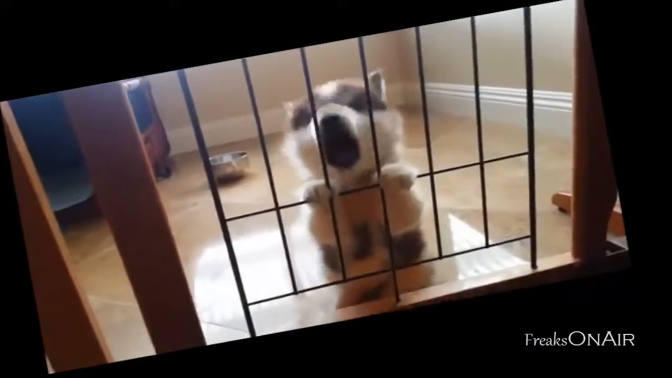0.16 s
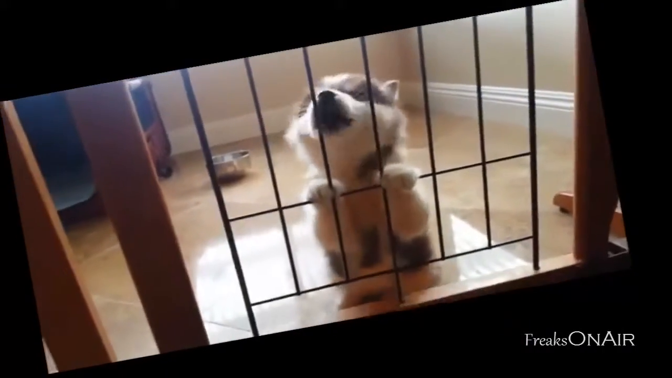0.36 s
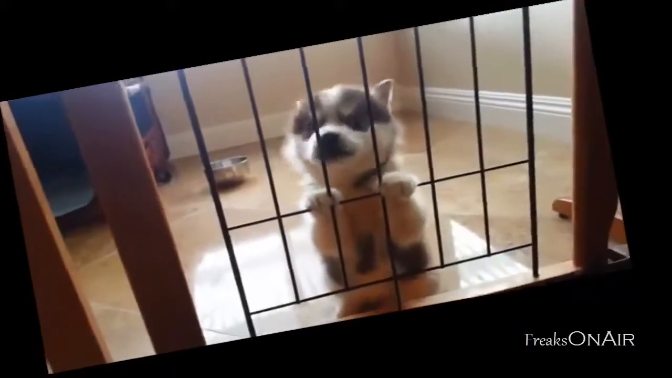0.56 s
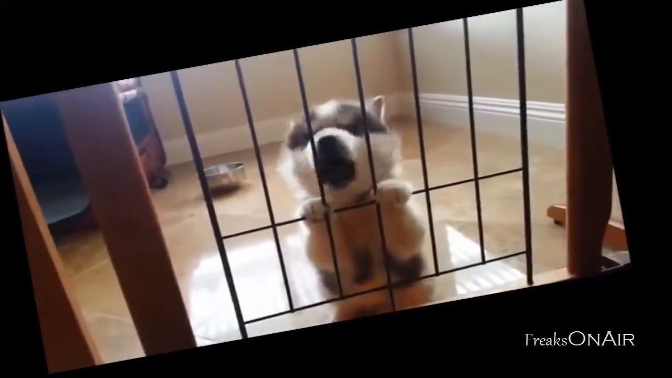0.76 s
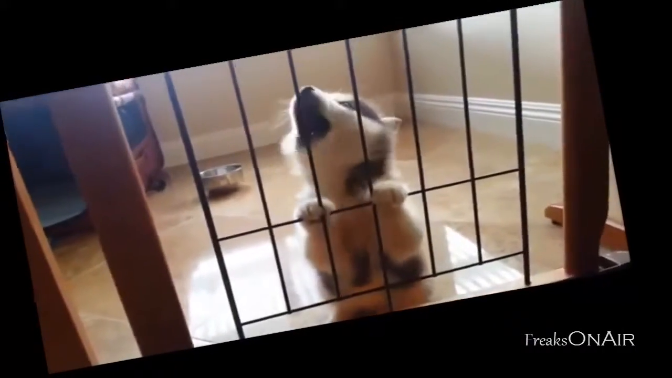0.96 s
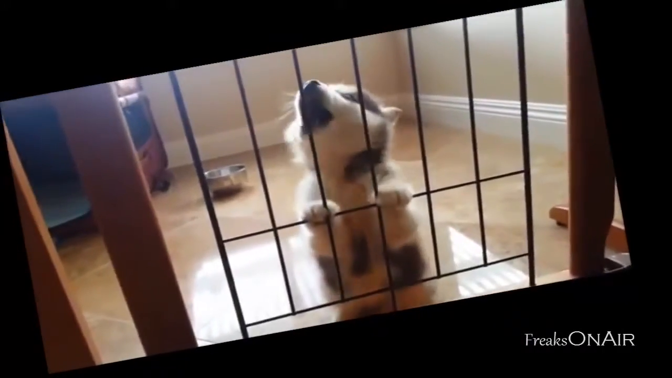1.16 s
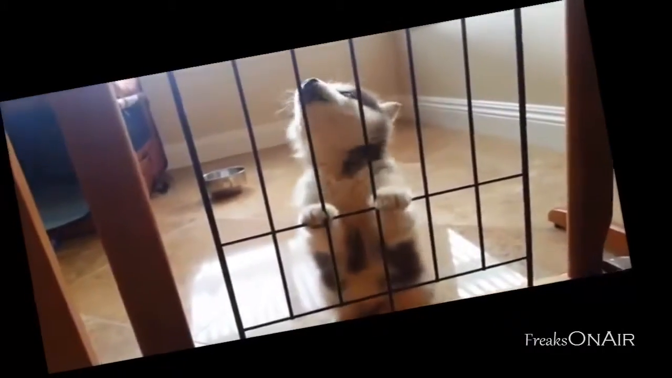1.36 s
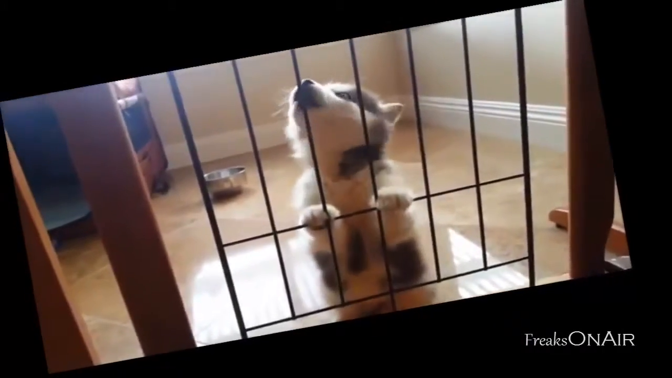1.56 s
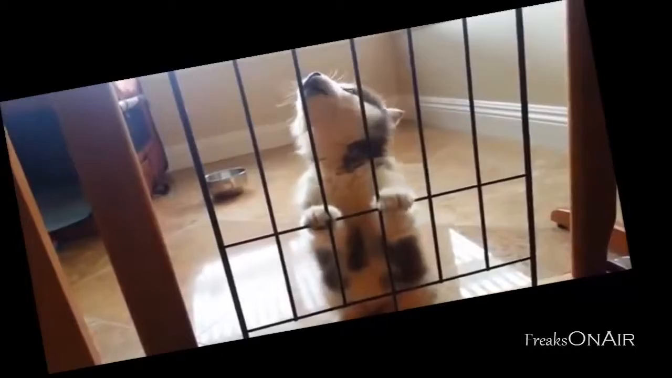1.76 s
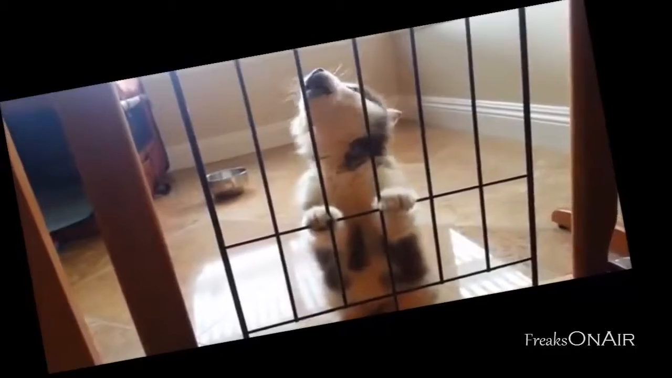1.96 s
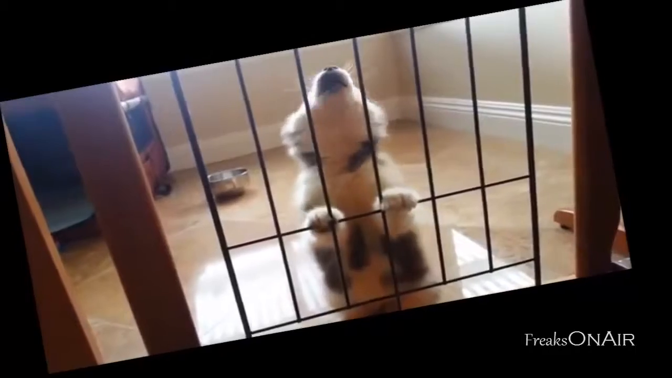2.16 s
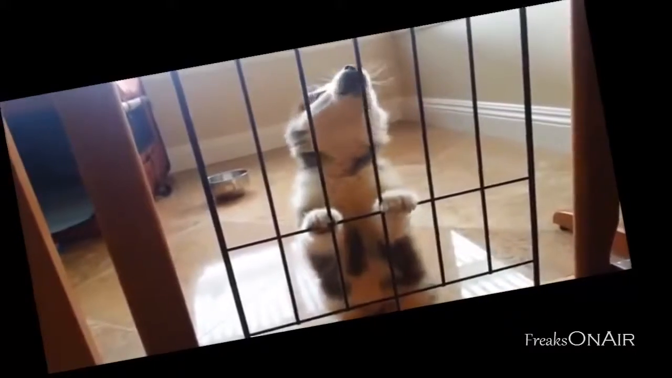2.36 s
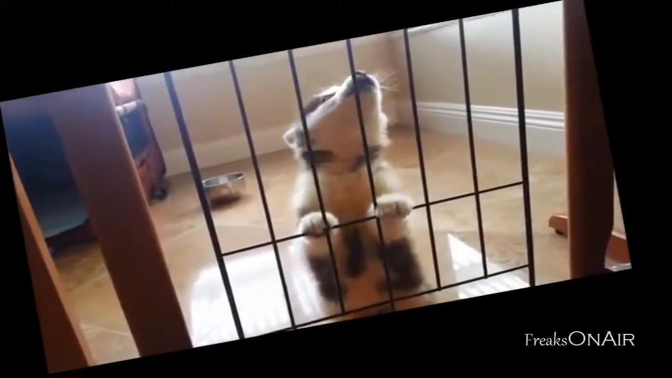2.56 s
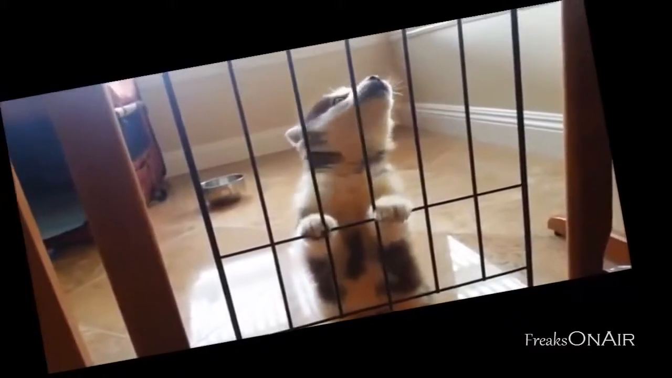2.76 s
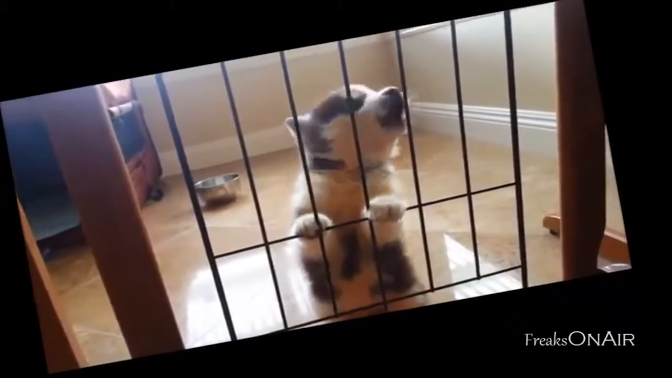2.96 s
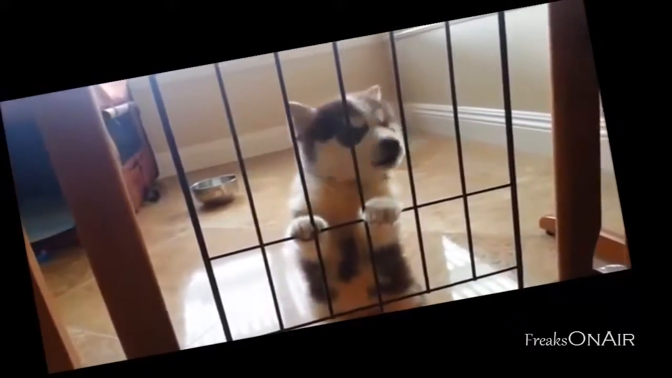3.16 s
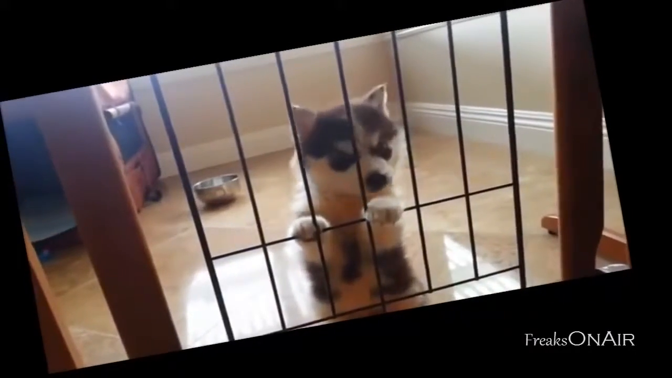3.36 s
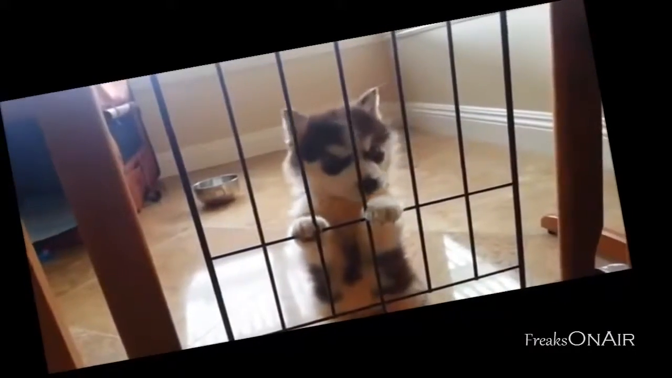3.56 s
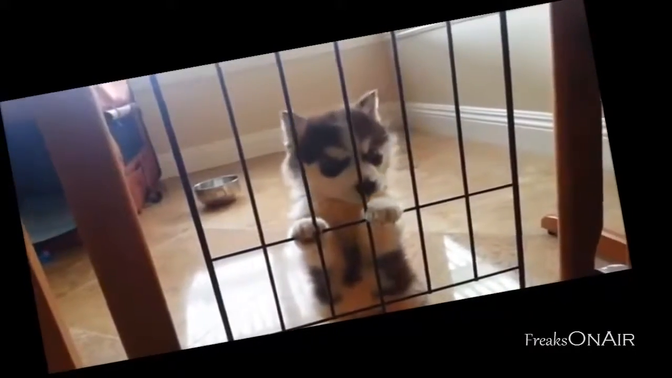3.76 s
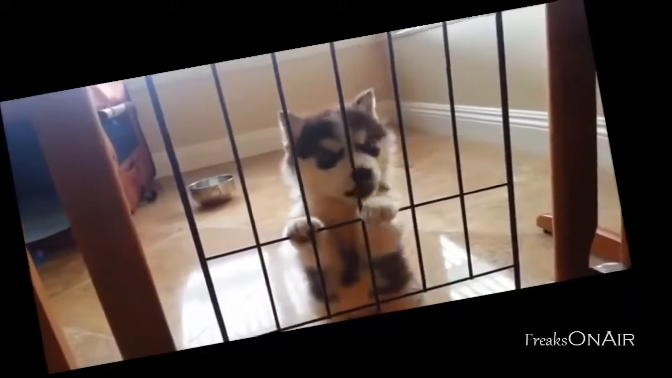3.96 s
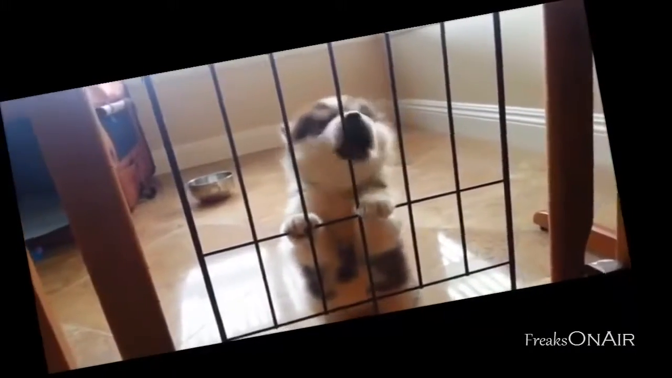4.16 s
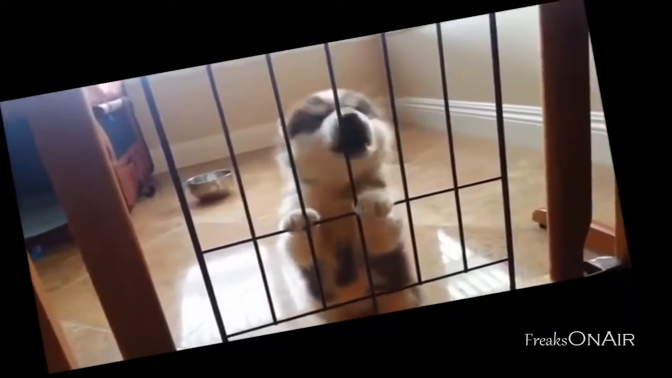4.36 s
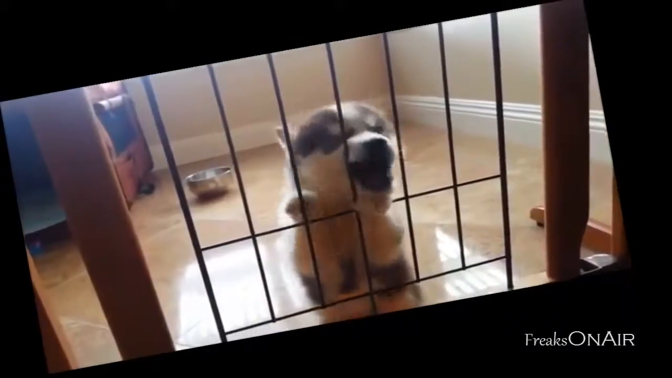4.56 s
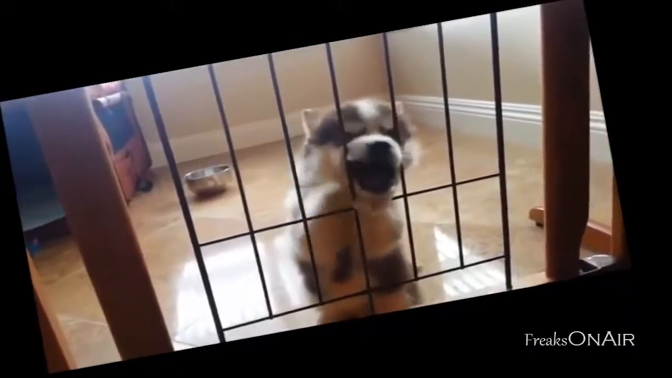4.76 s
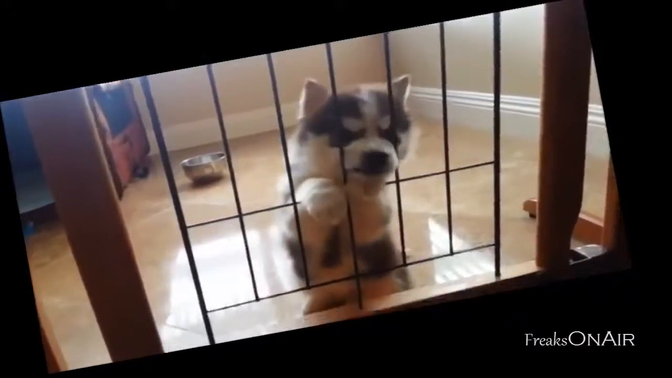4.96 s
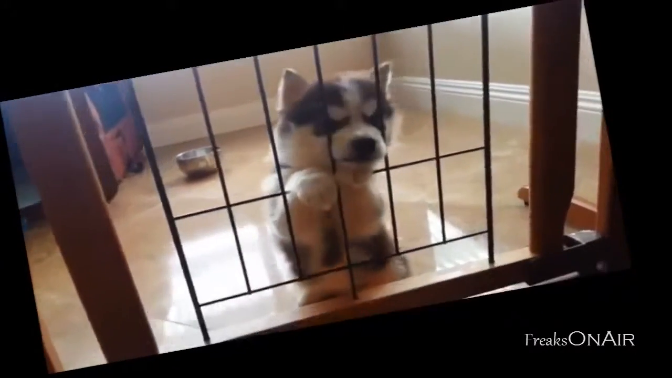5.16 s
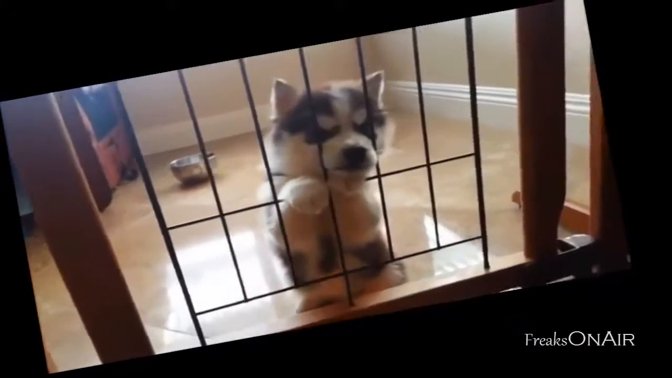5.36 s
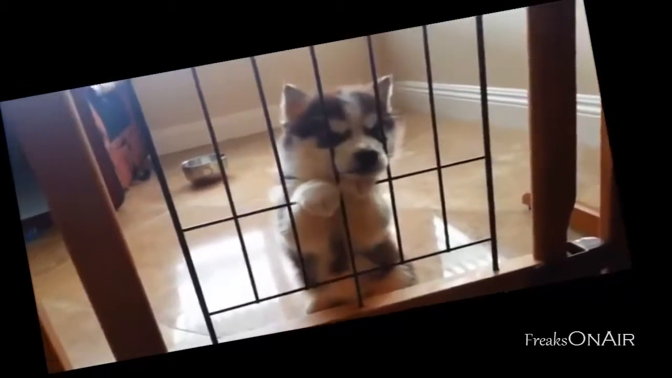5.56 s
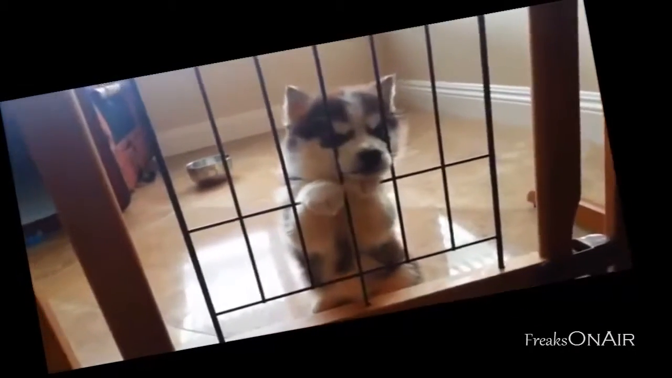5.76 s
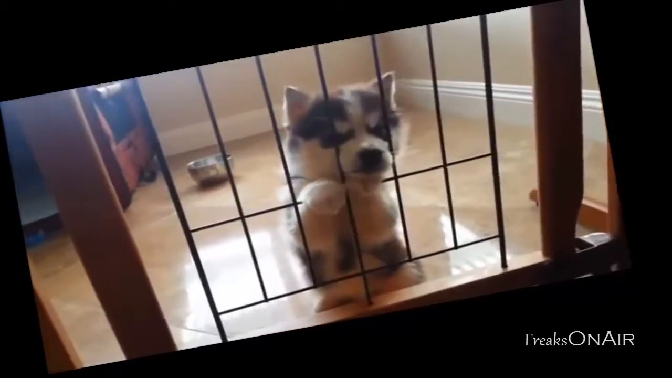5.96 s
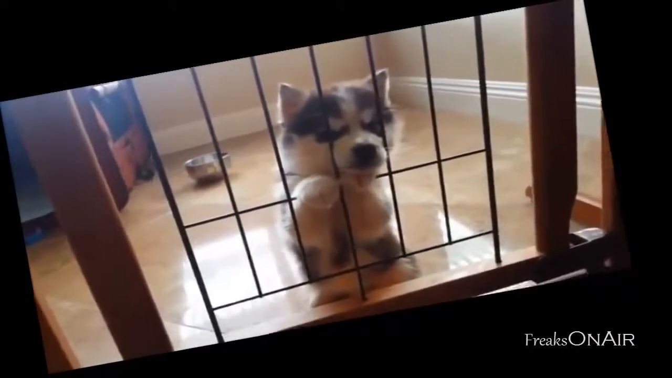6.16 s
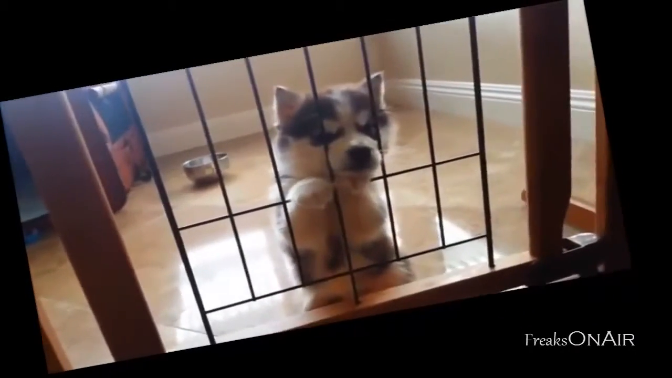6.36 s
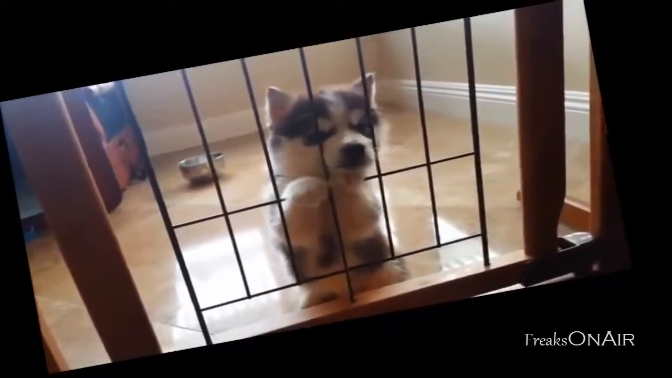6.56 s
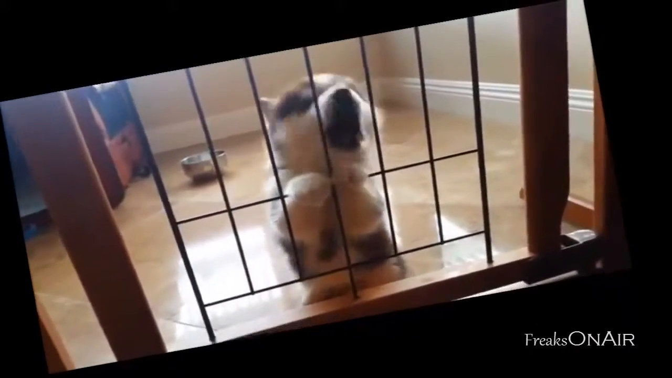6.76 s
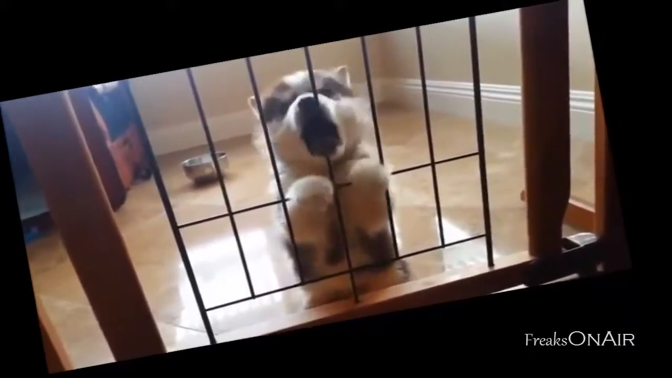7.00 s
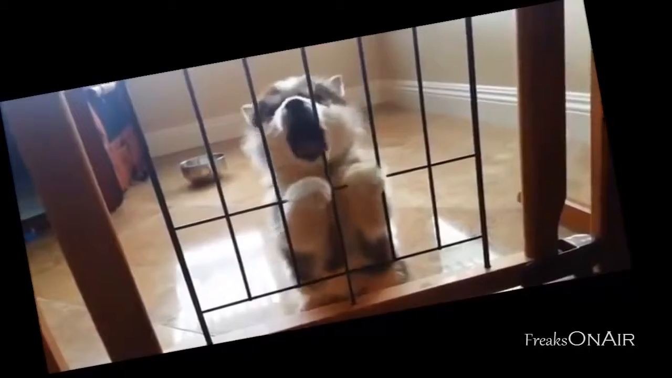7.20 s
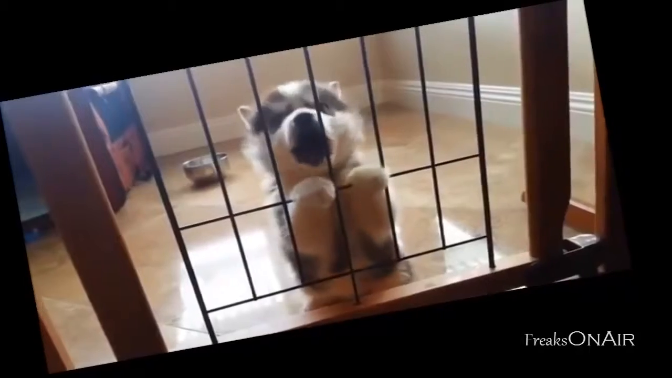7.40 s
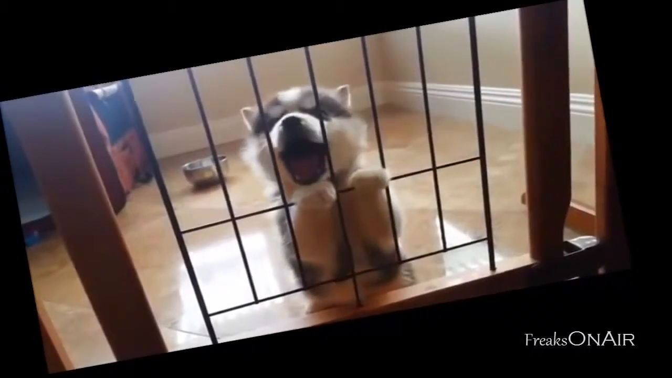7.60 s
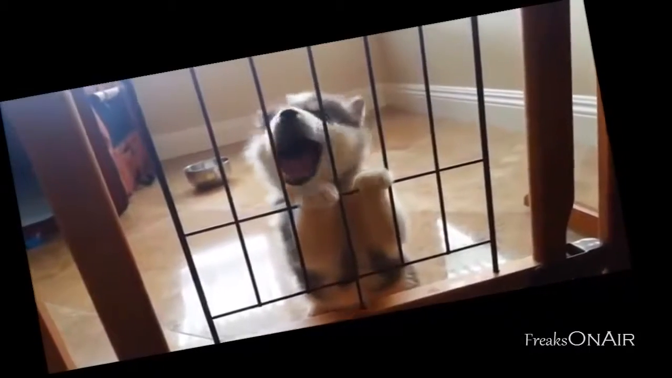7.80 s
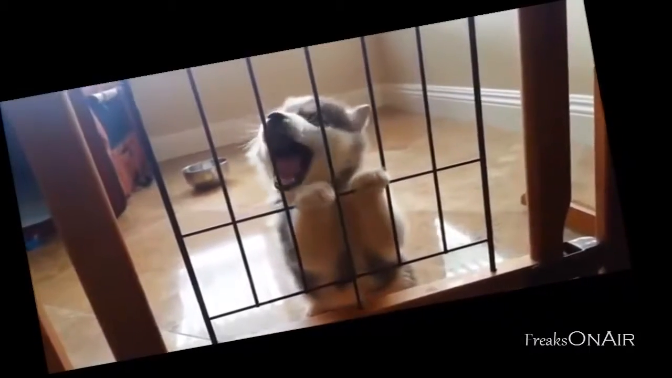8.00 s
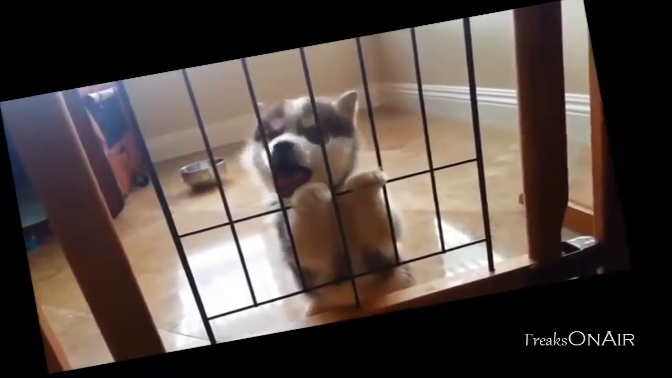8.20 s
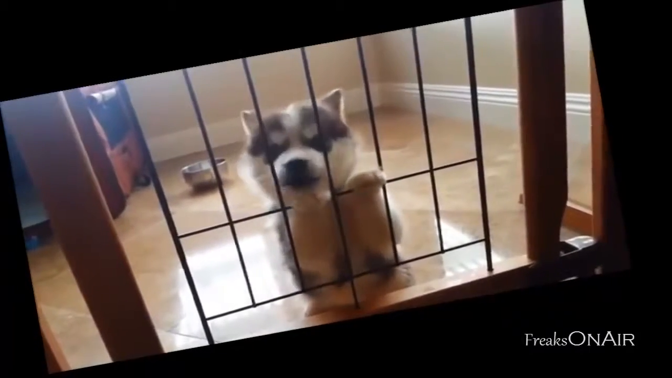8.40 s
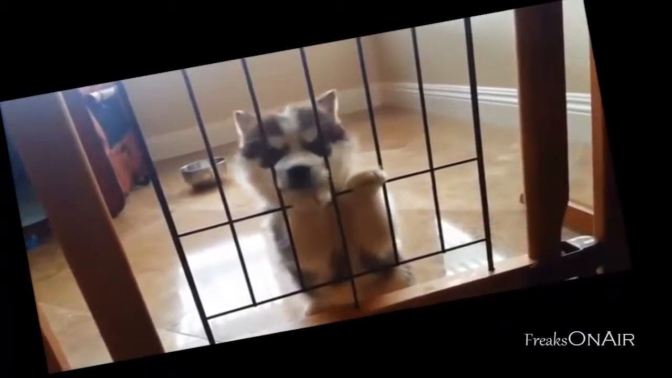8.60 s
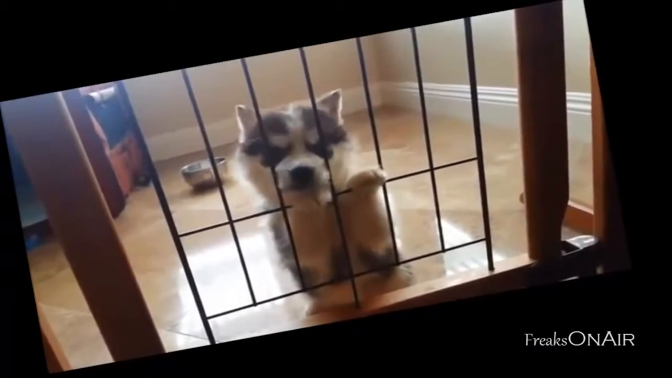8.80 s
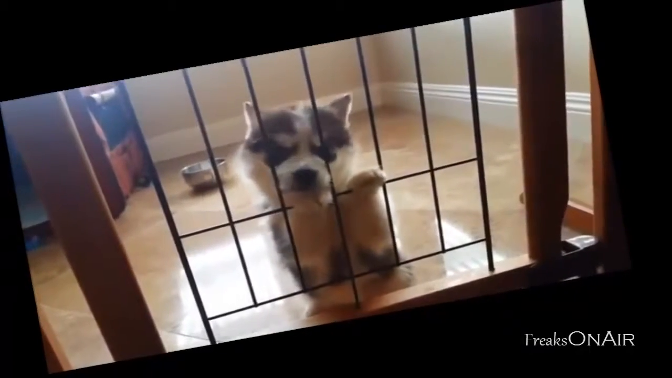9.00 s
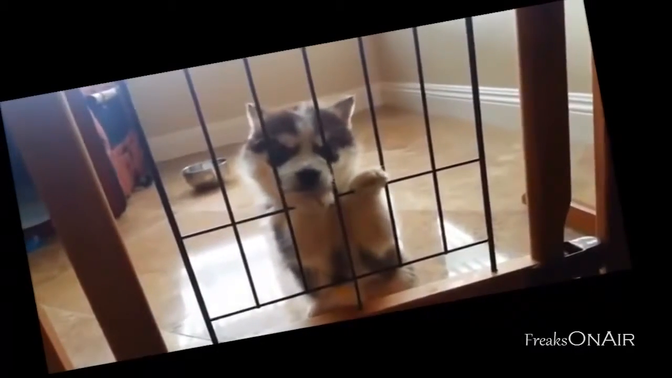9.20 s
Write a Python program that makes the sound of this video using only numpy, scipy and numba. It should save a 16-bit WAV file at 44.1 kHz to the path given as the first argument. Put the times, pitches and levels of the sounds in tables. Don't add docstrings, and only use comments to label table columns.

```python
import sys
import numpy as np
from scipy import signal
from scipy.fft import rfft, irfft
from scipy.io import wavfile
from scipy.ndimage import uniform_filter1d
from numba import njit

SR = 44100
rng = np.random.default_rng(int(sys.argv[2]) if len(sys.argv) > 2 else 0)


def log_audio(samples):
    frames = np.atleast_2d(samples).T
    limited = np.clip(frames, -1, 1)
    pcm = np.round(limited * 32767).astype(np.int16)
    wavfile.write(sys.argv[1], SR, pcm)


def gain_from_db(level_db):
    decades = np.asarray(level_db, float) / 20
    return 10 ** decades


N = 407471
TIME = np.arange(N) / SR

# (how wide the mouth opens, as treble in dB relative to the level).
CALLS = [(-.03, 0.17, 0.039, -18.5, -13.5), (0.344, 0.25, 0.22, -20, -10.5), (.935, .47, 0.058, -20, -10.5),
         (1.618, 0.057, 0.26, -18.5, -11), (2.071, 0.063, .09, -22, -25.5),
         (2.277, 1.114, 0.12, -28.5, -26.5), (4.074, 0.019, 0.04, -38.5, -48.5),
         (4.292, 0.86, .175, -22, -4), (6.903, 1.342, 0.01707, -21, -8), (8.438, 0.13, 0.43, -23, -8),
         (8.652, 0.68, 0.059, -37.5, -16)]
# time in seconds, pitch in Hz, swell of the mouth tone in dB.
HOWL_LINE = [(2.269, 578, -2), (2.418, 578.5, 4.5), (2.574, 567.5, 10.5), (2.62, 553, 2.5),
             (2.749, 528.8, 2.5), (2.948, 525.3, -4.5), (3.05, 525.2, 3), (3.39, 553, -12.5),
             (3.488, 617, 6.5)]
# time in seconds, centre of the shaded band in Hz, its width in Hz,
# jaw opening as a share of the usual, treble in dB.
HEAD_POSTURE = [(0, 3420, 500, 1.174, -2.5), (.3, 3060, 907, 0.71, 9.5), (.36, 3990, 301.8, 1.08, -0.5),
                (.55, 2986, 386.5, 1.084, -2.5), (.9, 2876, 500, 0.34, 8), (.95, 3710, 303.5, 0.85, -0.5),
                (1.14, 3896, 500, 1.52, 3), (1.25, 3735, 910, 1.3, -4.5), (1.45, 4336, 907, 0.92, 1.5),
                (1.65, 4484, 980, 0.96, -1), (2.1, 4432, 1395, 0.98, -1.5), (2.5, 4420, 1500, 0.95, 2.5),
                (2.9, 3980, 1203, 0.82, 3), (3.2, 4150, 1150, 1.215, 6), (3.45, 4240, 998, 1.27, 7.5),
                (4.3, 3537, 304, 1.24, -3.5), (4.62, 3248, 400, 0.9, 2.5), (5.0, 3333, 500, 1.334, -3.5),
                (5.3, 3060, 404.3, 0.79, 3.5), (6.9, 3760, 299, 1.12, 6.5), (7.0, 3664, 500, 0.9, -4),
                (7.35, 3630, 500, 1.34, 2.5), (7.5, 3695, 500, 0.99, 2), (8.3, 3940, 500, 1.035, -5.5),
                (8.45, 3817, 397.5, 1.06, -3), (8.56, 4020, 405, 1.1, 0.5), (8.66, 3910, 500, 0.91, -0.5),
                (9.24, 3980, 500, 0.88, 5.5)]


def along(table):
    s, *columns = np.transpose(table)
    return [np.interp(TIME, s, c) for c in columns]


def window(t0, t1, fade):
    return np.clip(np.minimum(TIME - t0, t1 - TIME + fade) / fade, 0, 1) ** 2


def even(x, span=0.018):
    power = uniform_filter1d(uniform_filter1d(x ** 2, int(span * SR)), int(span * SR))
    return x / np.sqrt(power + 1e-12)


def walk(rate):
    k = int(SR / rate)
    steps = np.repeat(rng.standard_normal(N // k + 1), k)
    return 1.5 * uniform_filter1d(uniform_filter1d(steps, k), k)[:N]


def butter(x, order, hz, kind="low"):
    return signal.sosfilt(signal.butter(order, hz, kind, fs=SR, output="sos"), x)


def shape(x, table, lag_s=0):
    hz, db = np.transpose(table)
    f = np.fft.rfftfreq(N, 1 / SR)
    gain = gain_from_db(np.interp(np.log(f + 1), np.log(hz), db))
    return irfft(rfft(x) * gain * np.exp(-2j * np.pi * f * lag_s), N)


@njit
def svf(x, hz, width):
    y, b, l = np.empty(len(x)), 0., 0.
    for i in range(len(x)):
        g, k = np.tan(np.pi * hz[i] / SR), width[i] / hz[i]
        v = (b + g * (x[i] - l)) / (1 + g * (g + k))
        b, l, y[i] = 2 * v - b, l + 2 * g * v, k * v
    return y


def ring(x, hz, width):
    hz, width = hz * np.ones(N), width * np.ones(N)
    return svf(svf(x, hz, width), hz, width)


def envelope():
    attack_s, attack_db, release_db = 0.026, -5.5, -26
    onset_bright_db, onset_bright_s, release_dull_db = 5, 0.18, -12
    level_db, gape_db, sounding = np.full(N, -60.), np.zeros(N), np.zeros(N)
    for s, hold, release, db, gape in CALLS:
        now = TIME >= s - .01
        age = TIME[now] - s
        fading = np.clip((age - hold) / release, 0, 1)
        level_db[now] = db + attack_db * np.clip(1 - age / attack_s, 0, 1) + release_db * fading
        brightness_db = onset_bright_db * np.exp(-age / onset_bright_s)
        gape_db[now] = gape + brightness_db + release_dull_db * np.sqrt(fading)
        sounding += window(s - .007, s + hold + release, .014)
    return level_db, gape_db, np.minimum(sounding, 1)


def melody():
    # start in seconds, first pitch in Hz, last pitch in Hz, roughness 0-1, odd harmonics in dB.
    short_notes = [(.345, 410.2, 1052, 0.41, -0.5), (.425, 1229, 762, 0.2, -9.5), (.55, 737, 880, 0.14, -3),
                   (.605, 859.4, 864, 0.11, -8.5), (.645, 858, 534, 0.03, 1.5),
                   (.935, 389.6, 497, 0.27, 9.5), (.975, 689.6, 734, 0.46, -6.5),
                   (1.02, 1157, 830.5, 0.12, -29.5), (1.112, 707, 765, 0.1, -1), (1.168, 805, 875, 0.4, -3),
                   (1.183, 1050, 1173, 0.35, -9), (1.206, 919, 874, 0.2, -22),
                   (1.222, 1040, 1190, 0.25, -8.5), (1.243, 590.6, 604.2, .4, -4.5),
                   (1.291, 854, 934, 0.03, -10.5), (1.335, 995.3, 1025, .06, -16),
                   (1.405, 1001, 603.5, 0.11, 3), (1.613, 440, 986, 0.24, -3.5), (1.7, 961, 744, .15, -10.5),
                   (1.735, 702, 553, 0.48, -1.5), (1.85, 546, 329.7, 0.33, -6.5),
                   (2.07, 389.7, 655, 0.21, 2.5), (2.128, 661, 640, 0.06, -10),
                   (4.074, 786.1, 772, 0.24, 7.5), (4.295, 374.9, 544.2, 0.26, 1.5),
                   (4.389, 500, 441.5, 0.28, -0.5), (4.463, 649.6, 814, 0.14, -5.5),
                   (4.542, 1088, 1106, 0.27, -17.5), (4.583, 1084, 897, 0.14, -5.5),
                   (4.625, 862.5, 953, 0.14, -9.5), (4.652, 659.8, 885.6, .25, -7.5),
                   (5.072, 932.6, 817.2, 0.19, -8.5), (5.099, 850, 920.7, 0.024, -4.5),
                   (5.132, 909.2, 790, 0.075, 4), (5.17, 774.3, 734.9, 0.089, 13.5),
                   (6.906, 500, 803.6, 0.22, -5), (6.962, 770, 791.5, 0.37, -14.5),
                   (6.985, 1152, 1209, 0.1, -35), (7.018, 1203, 832.4, 0.18, -40.5),
                   (7.077, 1160, 922, 0.52, -8), (7.113, 781.3, 828, 0.38, -28.5),
                   (7.144, 1227, 1071, 0.018, -28.5), (7.198, 1160, 1166, 0.27, -10.5),
                   (7.235, 988, 996.4, 0.081, -26), (7.263, 811, 832.6, 0.17, -7.5),
                   (7.29, 854, 1089, 0.44, -4.5), (7.302, 521.7, 703.8, 0.35, -10.5),
                   (7.322, 1051, 983.3, 0.077, -41), (7.352, 500, 500, .4, -11),
                   (8.439, 388.4, 610.4, 0.24, 5.5), (8.524, 610, 610, 0.038, 9),
                   (8.566, 302.7, 298.4, 0.034, 4.5), (8.6, 596.6, 517, .2, -2)]
    # time in seconds, pitch in Hz, swell of the mouth tone in dB.
    opening_line = [(0, 850, -6.5), (.04, 763, -7), (.07, 803, -6), (.1, 743.4, -5), (.14, 770, -3),
                    (.175, 1055, 9.5)]
    yip_line = [
        (3.497, 773, 12.5),
        (3.569, 743.8, -26),
    ]
    warble_line = [(4.701, 1090, -9), (4.723, 1134, 2), (4.78, 905, 2), (4.83, 930, 4.2), (4.875, 1075, 3),
                   (4.937, 915, 2.5), (4.995, 1070, 4.5), (5.047, 905, 1.5), (5.069, 937.7, 5)]
    squeal_line = [(7.396, 1010, -3), (7.45, 1094, 1), (7.523, 1191, -2.7), (7.562, 1100, -5.5),
                   (7.602, 1072, -4), (7.678, 1219, -4)]
    squeak_line = [(7.679, 1829, 6.5), (7.704, 1788, 7.5), (7.725, 1765, -8.5), (7.73, 1309, -4.5),
                   (7.803, 1377, -8)]
    whistle_line = [(7.808, 1702, -0.5), (7.851, 1821, 5.5), (7.89, 1619, -11), (7.93, 1623, -9),
                    (7.99, 1537, -13), (8.069, 1606, -12.5), (8.152, 1545, -5), (8.222, 1575, -12),
                    (8.267, 1698, -1)]
    moan_line = [(8.649, 517, 0), (8.7, 487.8, -0.5), (8.802, 516, -4), (8.942, 569.4, -10),
                 (8.978, 577.6, 6.5)]
    groan_line = [(8.985, 303.4, 0.6), (9.118, 306.2, 0.16), (9.199, 312, 0.45), (9.24, 309, -0.77)]
    # roughness 0-1, odd harmonics in dB, mouth resonance as a share of the usual.
    held_voicing = [
        (.08, 3, 1.1),
        (0.05, 4, 0.84),
        (.06, 1, 0.36),
        (0.09, -7, 1.046),
        (0.09, 4.5, 1.158),
        (.14, 1, 0.91),
        (.09, 1.5, 0.9),
        (.05, -5, 0.57),
        (.06, 2, 0.58),
    ]
    rise_bend, fall_bend = 2.3, .62
    low_start_hz, low_bend, leap_ratio = 530, 1.3, 1.9
    lines = [opening_line, HOWL_LINE, yip_line, warble_line, squeal_line, squeak_line,
             whistle_line, moan_line, groan_line]
    held = [(c[0][0], c[0][1], c[-1][1], *v) for c, v in zip(lines, held_voicing)]
    short = [(*n, 1) for n in short_notes]
    start, hz0, hz1, *voicing = np.transpose(sorted(short + held))

    stops = np.sort([s + hold + release for s, hold, release, *_ in CALLS] + [10])
    end = np.minimum(np.append(start[1:], 10), stops[np.searchsorted(stops, start)])
    k = np.clip(np.searchsorted(start, TIME) - 1, 0, None)
    done = np.clip((TIME - start[k]) / (end[k] - start[k]), 0, 1)
    even_climb = (hz0 < low_start_hz) & (hz1 < leap_ratio * hz0)
    bend = np.where(hz1 > hz0, np.where(even_climb, low_bend, rise_bend), fall_bend)
    hz = hz0[k] + (hz1 - hz0)[k] * done ** bend[k]
    swell_db = np.zeros(N)
    for line in lines:
        now = (TIME >= line[0][0]) & (TIME < line[-1][0] + .004)
        hz[now], swell_db[now] = (uniform_filter1d(c, 600)[now] for c in along(line))
    columns = (swell_db, *(v[k] for v in voicing))
    return uniform_filter1d(hz, 100), *(uniform_filter1d(c, 500) for c in columns)


def folds(hz, rough, odd_db):
    thin_db = -23
    breakup_hz, breakup_rad = 4000, 2.6
    jitter = 0.002 * walk(60) + rough * (.05 * walk(90) + .025 * walk(300))
    phase = 2 * np.pi * np.cumsum(hz * (1 + jitter)) / SR
    drift = [walk(35) for _ in range(9)]
    stray = [walk(150) for _ in range(7)]
    unsteady = np.clip(10 * rough, .2, 1)
    astray = breakup_rad * np.clip(10 * rough - .3, 0, 1)
    thin = np.clip((hz - 1400) / 100, 0, 1)
    tone = np.zeros(N)
    for k in range(1, 36):
        size_db = odd_db * (k % 2) + thin_db * (k > 3) * thin + 6.0 * unsteady * drift[k % 9]
        size = gain_from_db(size_db) * np.clip((11500 - k * hz) / 300, 0, 1)
        slip = astray * np.clip(k * hz / breakup_hz - .8, 0, 1) * stray[k % 7]
        tone += size * np.cos(k * phase + 0.36 * k * k + slip)
    tone = even(tone) * gain_from_db(8.7 * rough * walk(120))

    air = rng.standard_normal(N) * (1 + 0.54 * np.cos(phase))
    air = butter(air, 6, 1000, "high")
    flap_hz = 380 * (1 + 0.25 * walk(12) + 0.0499 * walk(120))
    flap = np.cos(2 * np.pi * np.cumsum(flap_hz) / SR)
    return tone, np.clip(4 * rough, 0, 1.5) * flap, (rough + 0.86 * thin) * air


def stress():
    # start in seconds, mouth in dB, throat in dB.
    push_steps = [(0, 1.5, -1), (.345, -1.5, 0), (.425, 0.5, -7), (.55, 0.5, 0), (.935, 0, 2),
                  (1.02, 0.5, -7), (1.115, 0, 4), (1.183, -0.5, -1.5), (1.243, -4.5, -3), (1.291, 1.5, 0),
                  (1.613, -4, -4.5), (1.645, 0, 2.5), (1.699, 2.5, -3.5), (1.735, -5.5, -1), (1.85, 2, -5),
                  (2.07, -2.5, -6), (2.105, 3.5, 1), (2.14, -5.5, -6), (2.27, -1, -4.5), (2.95, 0, -1),
                  (4.29, 1, -1.5), (4.389, -1, -2.5), (4.463, -1.5, -0.5), (4.543, 0, -2), (4.625, -7, -1),
                  (4.652, -0.5, 1), (4.7, -0.5, 0), (5.07, 0.5, -1), (6.9, -0.5, 0), (6.985, 1, -2),
                  (7.018, 2, -7), (7.076, 0.5, 1.5), (7.144, 1.5, -3.5), (7.198, -2.5, -0.5), (7.234, 0, 1),
                  (7.302, -6, -1.5), (7.321, 2, -4.5), (7.353, -6.5, -3), (7.395, 1, 1), (7.68, -1.5, 0.5),
                  (7.89, -0.5, 1.5), (8.431, -6, -6), (8.46, 0, 3), (8.524, 1.5, -5), (8.566, 1.5, -5),
                  (8.6, -4.5, -2.5), (8.65, 2.5, -3.5)]
    s, *columns = np.transpose(push_steps)
    k = np.clip(np.searchsorted(s, TIME) - 1, 0, None)
    return [uniform_filter1d(c[k], 500) for c in columns]


def mouth_tone(source, hz, rough, share, opening):
    base_hz, follows, open_mouth_hz = 500, 1.29, 1360
    width_share, rough_widens = 0.59, 1.2
    lips_hz, lips_width_hz, lips_db = 1710, 920, -22
    mouth_hz = np.maximum(base_hz + follows * uniform_filter1d(hz, 2000), open_mouth_hz)
    mouth_hz = np.clip(share * mouth_hz, 700, 3200)
    mouth_hz = np.maximum(650 + opening * (mouth_hz - 650), hz)
    width = width_share * (1 + rough_widens * rough) * np.minimum(share, 1) * mouth_hz
    howling = window(HOWL_LINE[0][0], HOWL_LINE[-1][0], 0.037)
    lips = gain_from_db(lips_db - 14 * howling) * ring(source, lips_hz, lips_width_hz)
    return even(butter(ring(source, mouth_hz, width) - lips, 4, 2700))


def throat_tone(hoarse, raised):
    # centre in Hz, width in Hz, level in dB.
    throat_bands = [
        (3094, 1300, 16.5),
        (4294, 2600, 13.5),
    ]
    lower, upper = (gain_from_db(db) * ring(hoarse, f, w) for f, w, db in throat_bands)
    return even(lower - upper * gain_from_db(-22 * raised))


def edge_tone(hoarse, hz):
    # centre in Hz, width in Hz, level in dB.
    edge_bands = [
        (6255, 1910, 18),
        (8090, 1900, 4.5),
        (11100, 3900, -24),
    ]
    teeth_hz, teeth_width_hz, teeth_db, teeth_db_per_octave = 8790, 1200, 27.5, 23.5
    edge = sum((-1) ** k * gain_from_db(db) * ring(hoarse, f, w) for k, (f, w, db) in enumerate(edge_bands))
    teeth_gain = gain_from_db(teeth_db + teeth_db_per_octave * np.log2(hz / 1500))
    edge = edge + teeth_gain * ring(hoarse, teeth_hz, teeth_width_hz)
    return even(butter(edge, 4, 5200, "high"))


def voice():
    muzzle_up_s, muzzle_down_s, muzzle_db = 1.56, 3.6, 0.5
    rough_mouth_db, rough_throat_db, rough_edge_db = -10, 10, 7.5
    high_note_db = -26
    edge_base_db, edge_gape = -5, 0.63
    edge_against_swell = 0.31
    hz, swell_db, rough, odd_db, mouth_share = melody()
    jaw, treble_db = along(HEAD_POSTURE)[2:]
    mouth_share = mouth_share * np.clip(jaw, .5, 2)
    level_db, gape_db, sounding = envelope()
    push_db, squeeze_db = stress()
    tone, flap, air = folds(hz, rough, odd_db)
    source = tone * (1 + 0.25 * flap) + 0.2 * air
    hoarse = tone * (1 + flap) + 0.3 * air

    mouth_db = swell_db + rough_mouth_db * rough
    opening = np.clip((level_db + mouth_db + 45.5) / 12, 0, 1)
    raised = window(muzzle_up_s, muzzle_down_s, 0.036)
    mouth = mouth_tone(source, hz, rough, mouth_share, opening)
    throat = throat_tone(hoarse, raised)
    edge = edge_tone(hoarse, hz)

    throat_db = gape_db + squeeze_db + rough_throat_db * rough
    throat_db = throat_db + muzzle_db * raised * (TIME > HOWL_LINE[0][0])
    throat_db = throat_db + high_note_db * np.log2(np.maximum(hz / 1200, 1))
    edge_db = edge_base_db + treble_db + edge_gape * gape_db + rough_edge_db * rough
    edge_db = edge_db - edge_against_swell * swell_db
    call = gain_from_db(mouth_db + push_db) * mouth - gain_from_db(throat_db) * throat + gain_from_db(edge_db) * edge
    return sounding * gain_from_db(level_db) * call + nose(hz)


def shade(x):
    notch_hz, notch_width_hz, notch_depth = 2716, 73, 0.45
    hz, width = along(HEAD_POSTURE)[:2]
    for _ in range(2):
        x = x - svf(x, hz, width)
    return x - notch_depth * ring(x, notch_hz, notch_width_hz)


def loudness(x, fall_s):
    keep = np.exp(-1 / (fall_s * SR))
    return 10 * np.log10(signal.lfilter([1 - keep], [1, -keep], x ** 2) + 1e-12)


def gate(puppy):
    # start in seconds, length in seconds, level in dB.
    clamps = [
        (4.5, .2, -8),
        (6.937, .2, -24),
        (7.242, 0.077, -12),
        (8.444, .06, -6),
    ]
    shut_db, open_db = -69.5, -54.5
    gate_db, knee_db, hold_s = -68, 16.5, 0.033
    duck_from_db, duck_slope, duck_s = -28.5, 1.7, 0.038
    opened = np.clip((loudness(puppy, hold_s) - gate_db) / knee_db, 0, 1)
    bright = loudness(butter(puppy, 2, 2600, "high"), duck_s)
    clamp_db = sum(db * window(s, s + length, .03) for s, length, db in clamps)
    duck_db = clamp_db - duck_slope * np.maximum(bright - duck_from_db, 0)
    return shut_db + (open_db - shut_db) * opened, duck_db


def hum(level_db, duck_db):
    # frequency in Hz, level in dB per Hz.
    rumble_colour = [(15, -59), (25, -32), (91, -14), (129, -7.5), (214, -12), (249, -10), (519, -16.5),
                     (1230, -27), (1840, -30), (2140, -37), (3820, -31), (10500, -35.5), (13600, -77.5),
                     (22000, -120)]
    # frequency in Hz, level in dB.
    boom_lines = [
        (133, 0),
        (160, -3),
        (188, -0.5),
    ]
    upper_hz, upper_duck = 230, 0.55
    mid, side = (shape(rng.standard_normal(N), rumble_colour) for _ in range(2))
    boom = sum(gain_from_db(db) * ring(rng.standard_normal(N), hz, 26) for hz, db in boom_lines)
    mid = mid / mid.std() + boom / boom.std()
    both = mid + 0.45 * side / side.std() * np.array([[1], [-1]])
    upper = signal.sosfiltfilt(signal.butter(2, upper_hz, "high", fs=SR, output="sos"), both)
    gain = gain_from_db(level_db + duck_db + 1.6 * walk(21) - 4.0)
    return gain * (both - (1 - gain_from_db(upper_duck * duck_db)) * upper)


@njit
def walls(x, lags, gain, damp):
    line, soft, out = np.zeros((8, 4096)), np.zeros(8), np.zeros((2, len(x)))
    for i in range(len(x)):
        total = 0.
        for k in range(8):
            soft[k] += (1 - damp) * (gain[k] * line[k, (i - lags[k]) & 4095] - soft[k])
            total += soft[k]
            out[k % 2, i] += soft[k]
        for k in range(8):
            line[k, i & 4095] = x[i] + soft[k] - total / 4
    return out


def room(puppy):
    t60_s, damp, room_db = 0.43, 0.29, -11.5
    lags = rng.integers(500, 2400, 8)
    return gain_from_db(room_db) * walls(puppy + 1e-18, lags, gain_from_db(-60 * lags / SR / t60_s), damp)


def two_ports(puppy):
    # time in seconds, lean to the left in steps of 0.056 dB (left minus right).
    head_turn = [(0.0, -10), (1.83, -14.5), (2.44, 21.5), (3.27, -15), (3.57, -19), (4.89, -6.5),
                 (6.56, 3.5), (6.77, -1.5), (8.0, -31), (8.16, -44), (9.24, 14)]
    # frequency in Hz, difference in dB.
    port_colour = [(60, -5), (110, 7), (190, 3.5), (330, -1.5), (590, -2.5), (1050, -5), (1850, -9),
                   (3280, -3), (5810, 6), (6700, -2), (7500, -10), (8400, -12), (10300, -17.5)]
    lag_s = 4.5e-5
    half = np.array(port_colour) * [1, .5]
    pan_db = 0.056 * (along(head_turn)[0] + 4)
    left = shape(puppy * gain_from_db(pan_db / 2), half)
    right = shape(puppy * gain_from_db(-pan_db / 2), half * [1, -1], lag_s)
    return np.array([left, right])


def early_echoes(near):
    # delay in milliseconds, left in dB, right in dB.
    echoes = [
        (1.1, -19, -30.5),
        (2.3, -11, -20.5),
        (3.7, -15, -37.5),
        (6.1, -27.5, -27),
        (9.4, -12, -10.5),
    ]
    return sum((-1) ** k * gain_from_db(np.array([db]).T) * np.roll(near, int(ms * SR / 1000), axis=1)
               for k, (ms, *db) in enumerate(echoes))


def pants():
    # start in seconds, length in seconds, first level in dB, last level in dB,
    # high hiss in dB relative to the low.
    breaths = [
        (3.432, 0.093, -64.5, -68, 18),
        (4.021, 0.054, -67.5, -59.5, 1),
        (4.077, 0.1594, -73, -50.5, -17.5),
        (5.313, 0.19, -45, -66.5, -7.5),
        (5.434, 0.12, -64, -64, 12.5),
        (5.667, 0.054, -41.5, -62, -9.5),
        (6.715, 0.2, -72, -84.5, 11.5),
        (6.866, 0.033, -70.5, -53, 0),
    ]
    # time in seconds, level in dB, frequency in Hz.
    ticks = [
        (4.0739, -41, 2196),
        (5.3415, -34, 2650),
        (5.443, -39.5, 2640),
        (5.7, -48, 2150),
        (5.8311, -46, 8230),
        (6.8701, -43, 8160),
    ]
    low = even(ring(rng.standard_normal(N), 2160, 1800), 0.058) * gain_from_db(2.0 * walk(37))
    high = even(ring(rng.standard_normal(N), 7000, 2700), .05) * gain_from_db(2.0 * walk(48))
    out = np.zeros(N)
    for s, length, db0, db1, hiss_db in breaths:
        level = gain_from_db(np.interp(TIME, [s, s + length], [db0, db1]))
        out += window(s, s + length, 0.046) * level * (low + gain_from_db(hiss_db) * high)
    t = np.arange(900) / SR
    for s, db, hz in ticks:
        tick = rng.standard_normal(900) + np.sin(2 * np.pi * hz * t)
        out[int(s * SR):int(s * SR) + 900] += gain_from_db(db - 3) * tick * np.exp(-t / 0.003)
    return out


def nose(hz):
    # time in seconds, frequency in Hz, level in dB.
    nose_line = [(7.861, 9500, -45), (7.879, 9730, -44.5), (7.988, 10080, -27.5), (8.076, 9680, -30.5),
                 (8.135, 9960, -31), (8.197, 9880, -30), (8.24, 9680, -46)]
    sideband_db = -5
    nose_hz, db = along(nose_line)
    upper, lower = (np.sin(2 * np.pi * np.cumsum(f + 25 * walk(80)) / SR) for f in (nose_hz, nose_hz - hz))
    whistle = upper + gain_from_db(sideband_db + 4.0 * walk(25)) * lower
    return window(nose_line[0][0], nose_line[-1][0], .02) * gain_from_db(db) * whistle


def scene():
    puppy = shade(voice()) + pants()
    near = two_ports(puppy)
    return gain_from_db(-1.0) * (near + early_echoes(near)) + room(puppy) + hum(*gate(puppy))


def suppress(x):
    around_hz, threshold_db, floor_db, from_hz = 2000, -19, -18, 240
    slope = 2.2
    hz, _, z = signal.stft(x, SR, nperseg=1024, noverlap=768)
    power = uniform_filter1d(uniform_filter1d(abs(z) ** 2, size=3, axis=1), size=7, axis=2)
    power = power.mean(axis=0) + 1e-14
    around = uniform_filter1d(power, int(around_hz / hz[1]), axis=0)
    cut_db = np.clip(slope * (10 * np.log10(power / around) - threshold_db), floor_db, 0)
    cut_db = cut_db * (hz[:, None] > from_hz)
    return signal.istft(z * gain_from_db(cut_db), SR, nperseg=1024, noverlap=768)[1][:, :N]


def band_limit(x):
    return signal.sosfilt(signal.butter(12, 10900, fs=SR, output="sos"), x)


def record(dry):
    top_cut = signal.ellip(10, .2, 90, 10800, fs=SR, output="sos")
    return band_limit(signal.sosfilt(top_cut, suppress(dry)))


dry = scene()
out = record(dry)
log_audio(out)
```